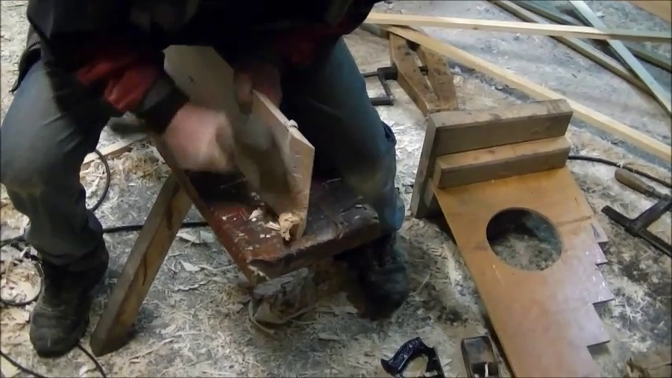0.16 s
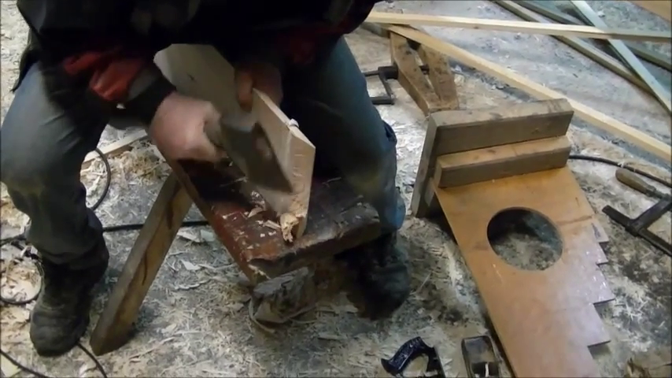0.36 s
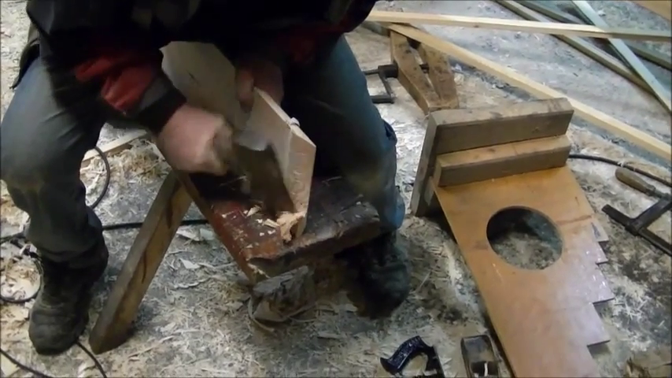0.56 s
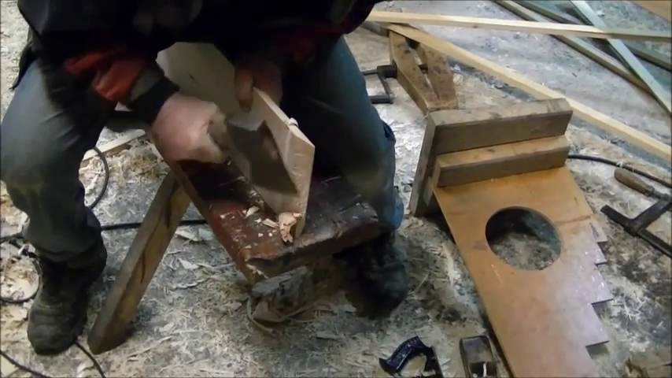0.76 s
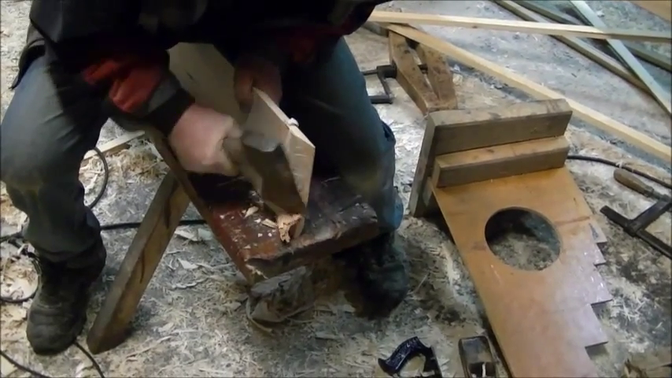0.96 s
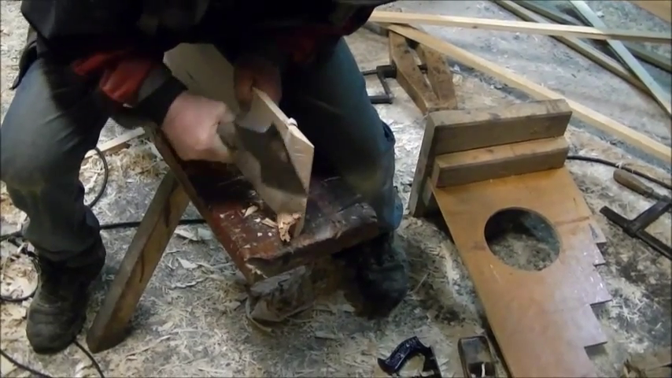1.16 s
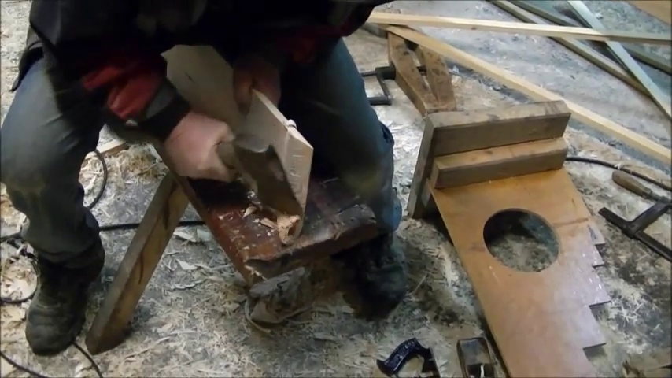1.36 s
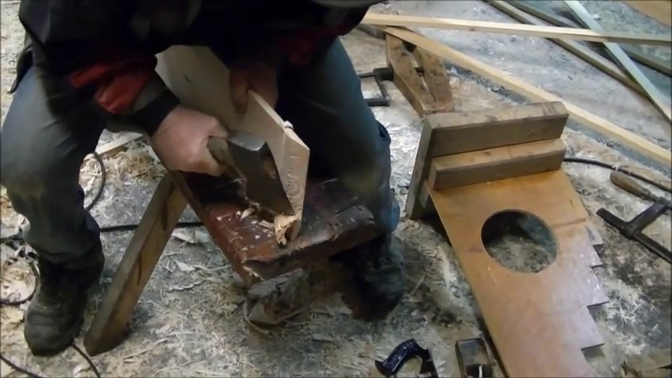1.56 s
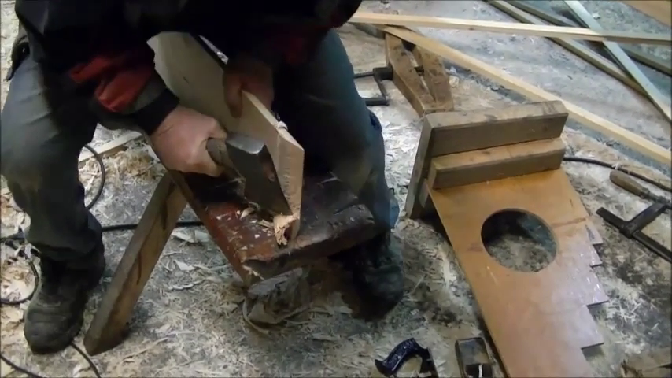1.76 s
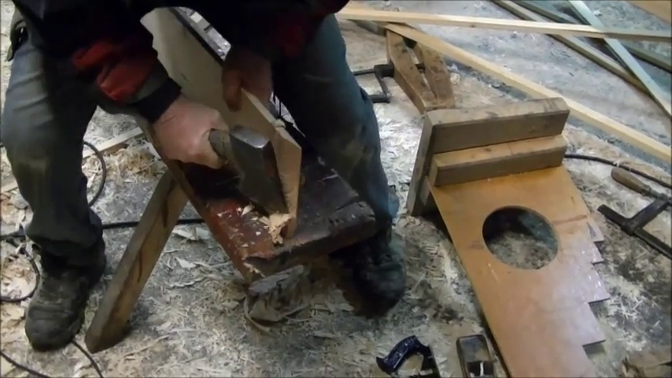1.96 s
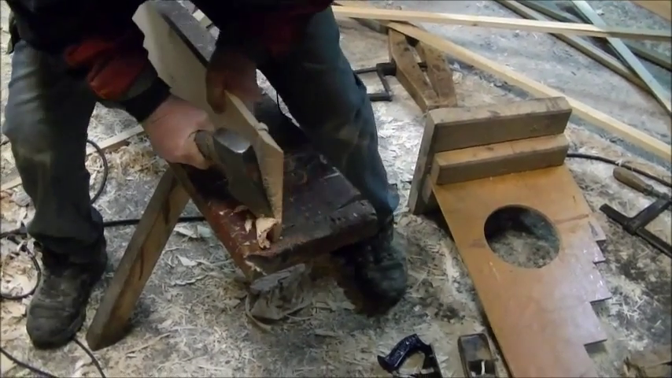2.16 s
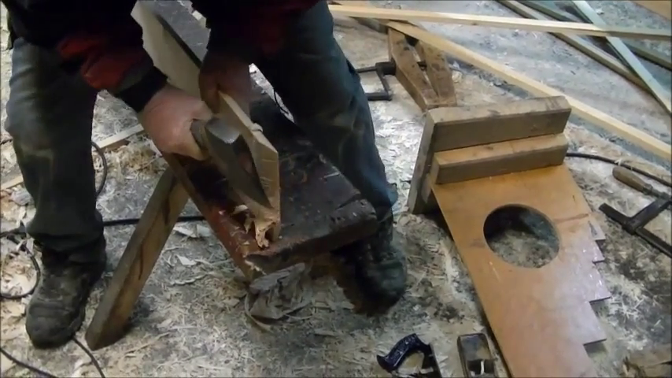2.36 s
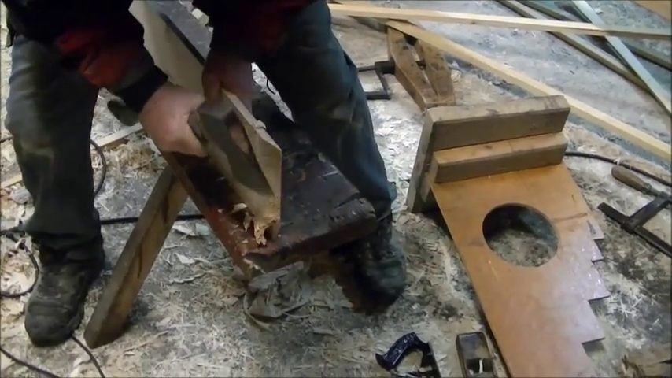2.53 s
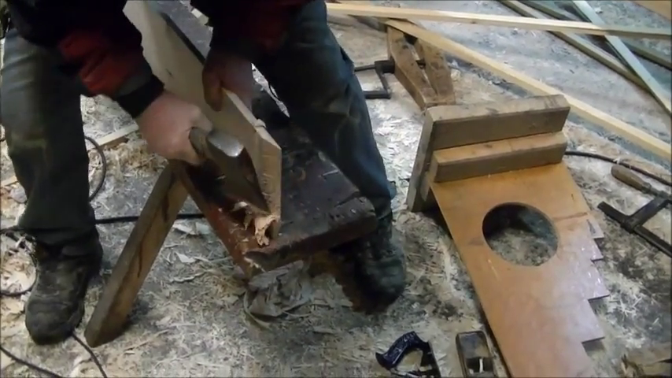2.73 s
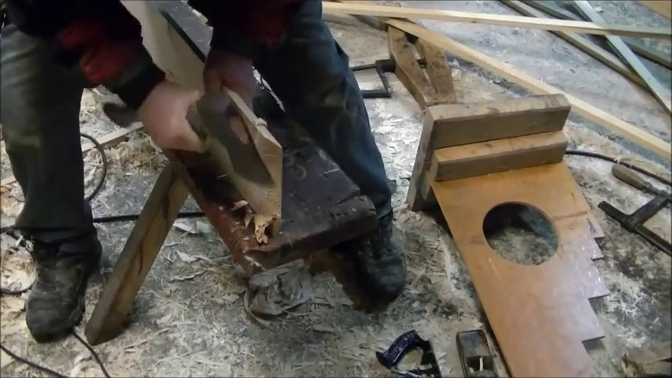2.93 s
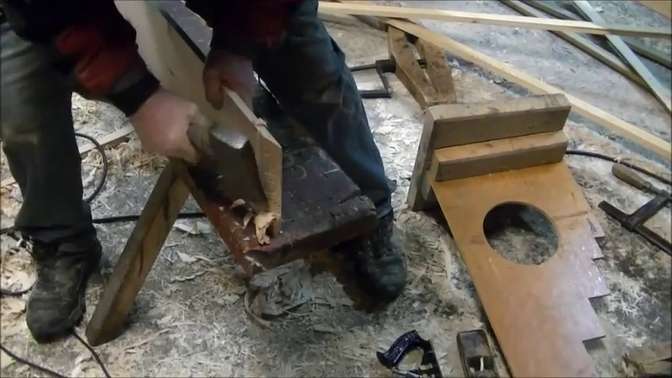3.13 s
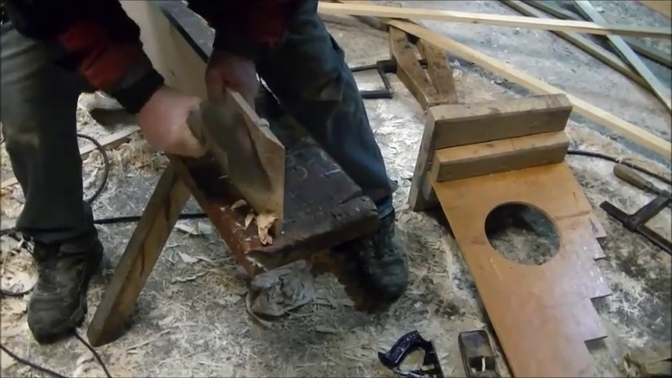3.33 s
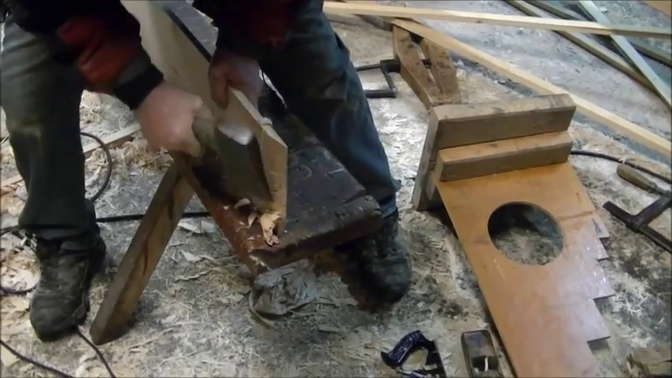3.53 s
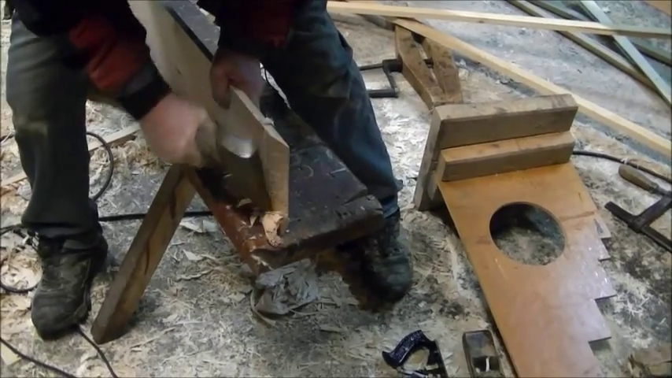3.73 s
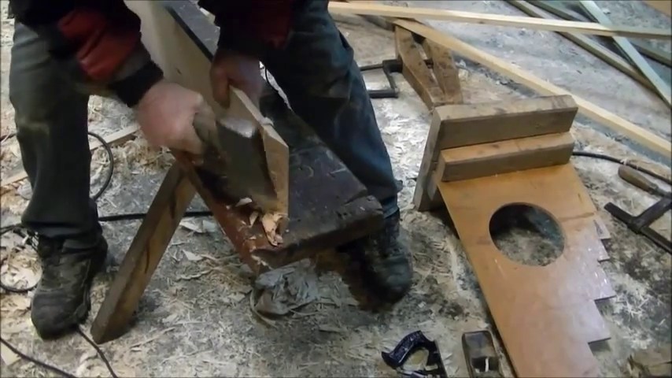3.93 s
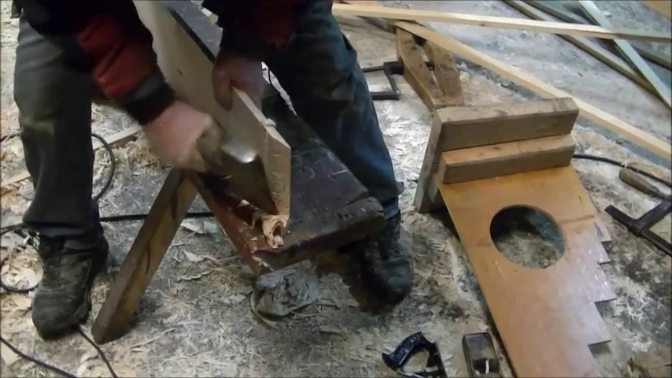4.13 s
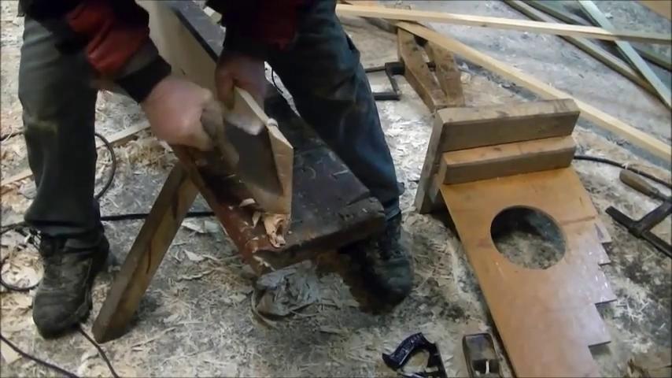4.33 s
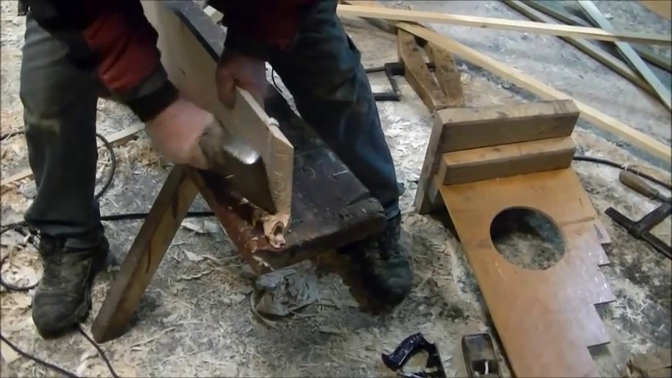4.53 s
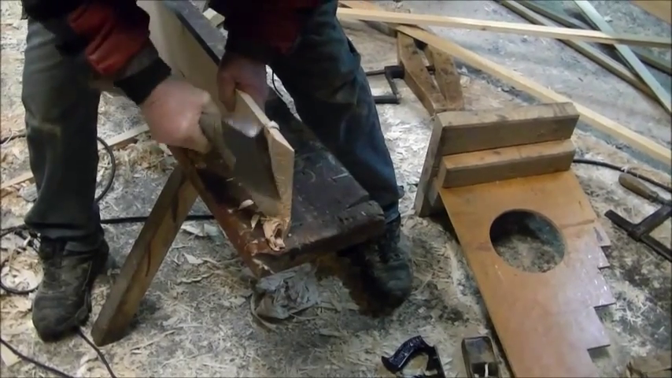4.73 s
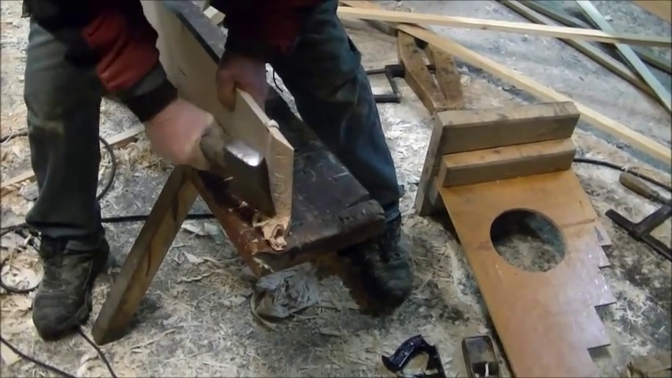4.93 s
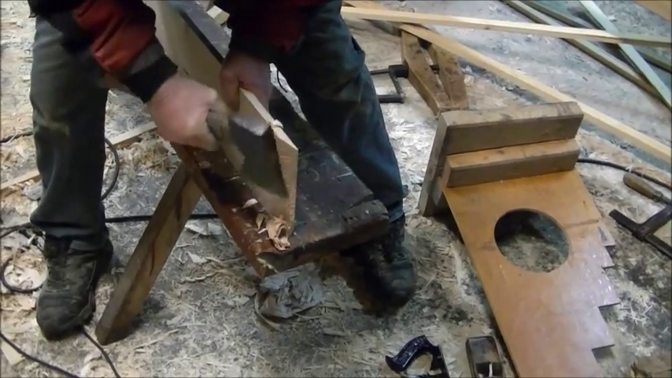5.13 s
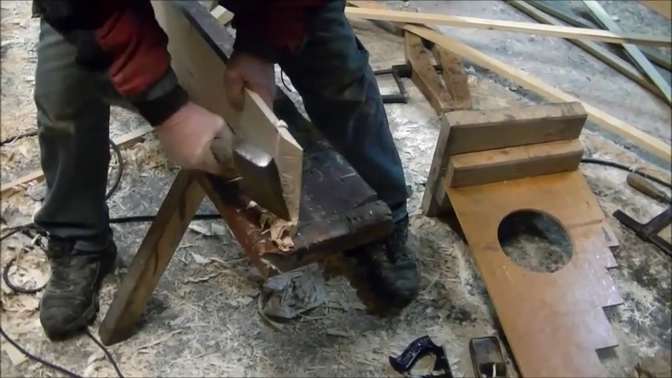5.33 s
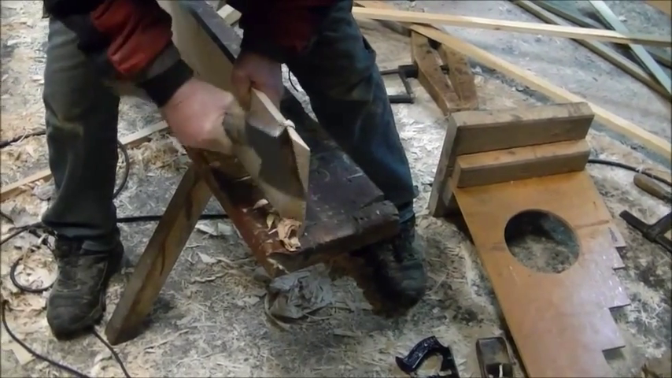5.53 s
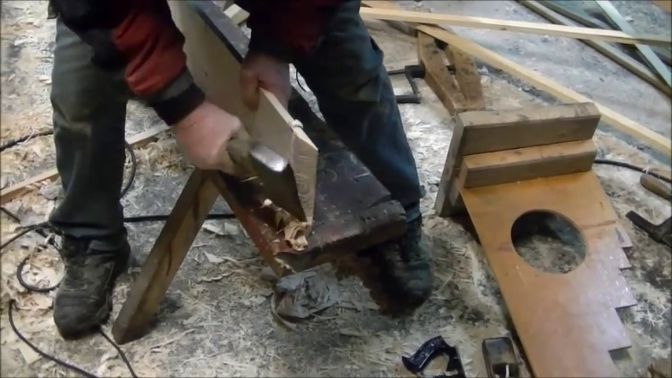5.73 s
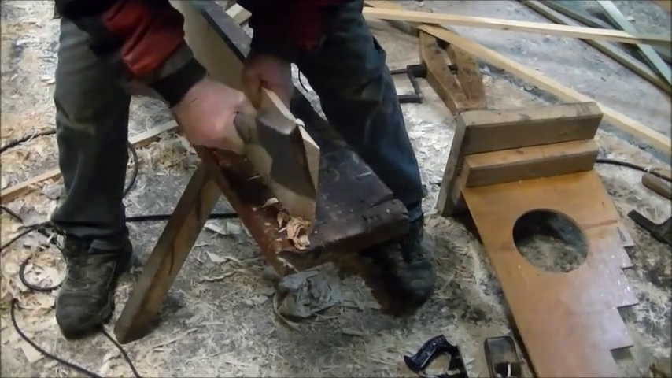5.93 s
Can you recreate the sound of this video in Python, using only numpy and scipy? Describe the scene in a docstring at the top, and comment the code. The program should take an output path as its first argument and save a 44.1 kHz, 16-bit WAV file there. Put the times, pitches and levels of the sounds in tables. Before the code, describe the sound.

Quick, sharp axe blows knock and crackle into wood in an echoing workshop, with one short break and small chips landing.

```python
"""Reverberant workshop: a hand axe hews the edge of a plank on a low wooden bench.
Each blow is a tick of the edge, a knock of plank and bench and a crackle of splitting fibres.
Chips land, a sleeve swishes, the plank bounces at times and is shifted in a short break.
A limiter ducks on the blows, so the room swells up behind them."""
import sys
import numpy as np
from scipy import signal
from scipy.fft import rfft, irfft, next_fast_len
from scipy.io import wavfile

SR = 44100
rng = np.random.default_rng(int(sys.argv[2]) if len(sys.argv) > 2 else 0)


def output_pcm(signal):
    """Save a mono or channel-first signal as 16-bit PCM at the path in sys.argv[1].

    Samples are clipped to [-1, 1] before scaling.
    """
    pcm = np.clip(np.atleast_2d(signal).T, -1, 1) * 32767
    wavfile.write(sys.argv[1], SR, np.round(pcm).astype(np.int16))


N = 268128
LEAD = SR // 4  # samples before t = 0: work already under way
TIME = np.arange(-LEAD, N) / SR

# axe blows: t/s, skid before bite/s, plank/dB, bench/dB, brightness/Hz, split/dB, split half-length/s
AXE_BLOWS = [ (-.16, 0.00093, -1.5, -5.5, 1950, -4, .002), (.2278, 0.00025, 11.5, -3, 2410, -9.5, 0.0038),
             (.6134, 0.00055, 13, -6, 2300, -10.5, .003), (1.02, 0.00005, 11, -11, 2860, -8, 0.0027),
             (1.405, 0.00039, 10, -3.5, 3630, -14, 0.0035), (2.6476, 0.00033, 8.5, -3, 2480, -9, 0.0032),
             (3.0389, 0.00073, 9.5, 1.5, 2550, -11.5, .0025), (3.4198, 0.0021, 1.5, -5, 2870, -3, 0.00061),
             (3.7845, 0.000043, 7.5, -5.5, 3560, -9.5, 0.0036),
             (4.1685, 0.001954, 9, -3, 3530, 0.5, 0.0013), (4.546, 0.0076, -0.5, -11.5, 2370, -20.5, .011),
             (4.9334, .0008, 4.5, -13.5, 3040, -12, .006),
             (5.3428, 0.0067, -2.5, -9.5, 2440, -16.5, 0.0082),
             (5.733, 0.0035, -12, -9.5, 2400, -13.5, 0.0026)]
# spectrum of snapping fibres: f/Hz, relative level/dB
FIBRE_SPECTRUM = [(300, -8), (1500, 5), (2500, 1), (4000, -5), (6200, -13), (8200, -2), (10500, -1),
                  (13000, -14), (16000, -18), (18000, -30)]


def from_db(db):
    """Decibels to gain."""
    return 10 ** (np.asarray(db) / 20)


def at_hz(points, hz):
    """Read a table on a log-frequency axis."""
    points_hz, values = np.transpose(points)
    return np.interp(np.log(np.maximum(hz, 1)), np.log(points_hz), values)


def colour(x, spectrum):
    """Filter by a spectrum; white input keeps its power."""
    size = next_fast_len(x.shape[-1])
    gain = from_db(at_hz(spectrum, np.fft.rfftfreq(size, 1 / SR)))
    gain /= np.sqrt(np.mean(gain ** 2))
    return irfft(rfft(x, size) * gain, size)[..., :x.shape[-1]]


def cut(x, hz, kind, order=2):
    """Causal Butterworth filter."""
    return signal.sosfilt(signal.butter(order, hz, kind, fs=SR, output="sos"), x + 1e-18)


def add(track, at_s, sound):
    """Mix a sound into a track."""
    start = max(LEAD + round(at_s * SR), 0)
    track[start:start + len(sound)] += sound[:len(track) - start]


def diffuse(count):
    """White stereo noise, alike in the bass, nearly unrelated in the treble."""
    # f/Hz, left-right correlation
    correlation = [(60, 0.29), (130, .91), (290, 0.78), (640, 0.66), (1400, 0.19), (3100, -0.23),
                   (6800, -0.32), (15000, -0.055)]
    size = next_fast_len(count)
    mid, side = rfft(rng.standard_normal((2, size)))
    alike = at_hz(correlation, np.fft.rfftfreq(size, 1 / SR))
    spectra = np.sqrt((1 + alike) / 2) * mid + np.sqrt((1 - alike) / 2) * side * [[1], [-1]]
    return irfft(spectra, size)[:, :count]


def crackle(count, uneven_db):
    """Dense snaps of uneven size; rms 1."""
    snaps = rng.standard_normal(count)
    snaps *= from_db(uneven_db * np.clip(rng.standard_normal(count), -2, 2))
    return snaps / np.std(snaps)


def strike(modes, scatter_db=1.0, detune=0.02):
    """Struck body: the contact point shifts each mode's level and pitch; neighbours swing oppositely."""
    hz, db, t60_s = np.transpose(modes)[:, :, None]
    t = np.arange(SR // 8) / SR
    strength, pitch = rng.standard_normal((2, len(modes), 1))
    envelopes = from_db(db + scatter_db * strength - 60 * t / t60_s)
    rings = envelopes * np.sin(2 * np.pi * hz * (1 + detune * pitch) * t)
    return rings[::2].sum(axis=0) - rings[1::2].sum(axis=0)


def wood_knocks(bounce_lowpass_hz=900, bounce_count=3, bounce_loss_db=9.5):
    """The edge bites, plank and bench ring; a softer bite is duller. The loose plank bounces at times."""
    # modes: f/Hz, level/dB, t60/s
    plank_modes = [(786, -15.5, 0.012), (1190, -0.5, 0.0042), (1398, 2.5, 0.0069), (1760, 1.5, 0.0052),
                   (2122, -1, 0.0048), (3184, -10, 0.0069), (3750, -10, 0.0035)]
    bench_modes = [(236.5, -1.5, 0.04), (307, -8.5, 0.095), (379.6, -8, 0.033), (463, -6.5, 0.03),
                   (555, -4.5, 0.013), (676.7, -18.5, 0.13), (732, -17.5, 0.065), (984, -14.5, 0.047)]
    # plank kicks against the bench: t/s, level/dB, bounce gap/s
    kicks = [(1.689, -24.5, 0.012), (2.031, -29.5, 0.039), (2.147, -33, .012), (3.0481, -5.5, 0.0071),
             (4.567, -4.5, .011), (4.962, -1.5, 0.0069), (5.751, -5, 0.031)]
    plank, bench = np.zeros((2, len(TIME)))
    for at_s, skid_s, plank_db, bench_db, bright_hz, *_ in AXE_BLOWS:
        ring = cut(strike(plank_modes), bright_hz, "low", order=3)
        add(plank, at_s + skid_s, from_db(plank_db) * ring)
        add(bench, at_s + skid_s, from_db(bench_db) * strike(bench_modes))
    for at_s, db, gap_s in kicks:
        for k in range(bounce_count):
            thump = cut(strike(bench_modes, scatter_db=2.0, detune=0.04), bounce_lowpass_hz, "low")
            add(bench, at_s + k * gap_s, from_db(db - k * bounce_loss_db) * thump)
    return cut(plank, 75, "high"), cut(bench, 153, "high")


def fibre_cracks(tick_decay_s=0.00085, ahead_db=-2.0, skid_loss_db=24, skid_scale_s=0.00053):
    """The edge ticks on entry, fibres tear as the shaving lifts. Returns the sound ahead and all round."""
    ahead, around = np.zeros((2, len(TIME)))
    t = np.arange(SR // 20) / SR
    for at_s, skid_s, _, _, bright_hz, split_db, half_length_s in AXE_BLOWS:
        tick_db = -skid_loss_db * (1 - np.exp(-skid_s / skid_scale_s))  # a square hit ticks loudest
        tick_db += 6 * np.log2(bright_hz / 2930)  # a duller blow ticks less, 6 dB/octave
        tick = from_db(tick_db) * np.exp(-t / tick_decay_s)
        split_peak_s = skid_s + 0.0012 + 0.43 * half_length_s
        split = from_db(split_db) * np.exp(-0.5 * ((t - split_peak_s) / half_length_s) ** 2)
        burst = (tick + split) * crackle(len(t), uneven_db=3.0)
        add(ahead, at_s, burst)
        # summed over all directions: same energy, flat spectrum
        flat_burst = irfft(np.exp(1j * np.angle(rfft(burst))))
        add(around, at_s, np.linalg.norm(burst) * flat_burst)
    return from_db(ahead_db) * colour(ahead, FIBRE_SPECTRUM), colour(around, FIBRE_SPECTRUM)


def chips(decay_s=0.0016, highpass_hz=5000, crumb_db=-51, flight_s=(0.12, 0.43)):
    """Larger chips, and one crumb thrown by each blow, land with a thin tick."""
    # larger chips landing: t/s, level/dB
    landings = [(.0773, -34), (1.616, -40), (1.6765, -38), (2.1247, -37), (2.16, -47), (2.258, -28.5),
                (3.3659, -43)]
    crumbs = [(at_s + rng.uniform(*flight_s), crumb_db) for at_s, *_ in AXE_BLOWS]
    ticks = np.zeros(len(TIME))
    t = np.arange(SR // 50) / SR
    for at_s, db in list(landings) + crumbs:
        tick = np.exp(-t / decay_s) * rng.standard_normal(len(t))
        add(ticks, min(at_s, TIME[-1]), from_db(db) * tick)
    return cut(colour(ticks, FIBRE_SPECTRUM), highpass_hz, "high")


def sleeve_swish(level_db=-56, swing_s=0.025):
    """A sleeve swishes on each downstroke, peaking just before the blow."""
    # cloth rubbing: f/Hz, relative level/dB
    spectrum = [(2000, -6), (6000, -31), (10000, -8), (12000, -15), (15000, -31)]
    swings = sum(np.exp(-0.5 * ((TIME - at_s) / swing_s + 1) ** 2) for at_s, *_ in AXE_BLOWS)
    return from_db(level_db) * swings * colour(rng.standard_normal(len(TIME)), spectrum)


def plank_scrape(rise_db_per_s=158, fall_db_per_s=227):
    """The plank scrapes as it is shoved to a new grip."""
    # shove peaks: t/s, level/dB
    shoves = [(2.035, -42.5), (2.145, -44.5), (2.324, -53.5)]
    # wood sliding: f/Hz, relative level/dB
    spectrum = [(80, -42), (250, -36), (500, -7), (1500, 8), (3000, -4), (6000, -16), (10000, -4.5),
                (15000, -19)]
    envelope = np.zeros(len(TIME))
    for at_s, db in shoves:
        below_peak_db = np.maximum(rise_db_per_s * (at_s - TIME), fall_db_per_s * (TIME - at_s))
        envelope += from_db(db - below_peak_db)
    return envelope * colour(crackle(len(TIME), uneven_db=15.0), spectrum)


def near_echoes(x, band_hz=(700, 2600)):
    """The plank's faces beam its midrange at near surfaces, which return it within milliseconds."""
    # reflections: delay/s, level/dB
    echoes = [(.0012, -28), (.0052, -30), (.0083, 5)]
    beam = cut(x, band_hz, "band", order=1)
    return sum(from_db(db) * np.interp(TIME - delay_s, TIME, beam) for delay_s, db in echoes)


def clutter(x, level_db=-2, span_s=0.0029, band_hz=(500, 4500)):
    """Floor, legs and lumber scatter a dense spray of early reflections."""
    t = np.arange(SR // 30) / SR
    spray = diffuse(len(t)) * t / span_s * np.exp(-2 * t / span_s)
    spray *= from_db(level_db) / np.linalg.norm(spray, axis=1, keepdims=True)
    midrange = cut(x, band_hz, "band", order=1)
    return signal.fftconvolve(midrange[None], spray, axes=1)[:, :len(x)]


def reverb(x, build_s=0.00077, mode_t60_s=0.78):
    """Diffuse reverberation, dying faster in the treble, plus a few standing waves."""
    # diffuse tail: f/Hz, level/dB
    tail_db = [(60, -10), (110, 3), (200, 3), (300, 7), (600, 14), (1400, 3), (3000, 1), (6000, -0.5),
               (10000, -14), (15000, -7)]
    # tail decay: f/Hz, t60/s
    tail_t60_s = [(100, 1), (300, 1), (1200, 1), (2500, 0.81), (5000, 0.62), (10000, 0.36), (15000, .35)]
    # standing waves: f/Hz, level/dB
    room_modes = [(172, 17.5), (251, 14), (921, 19), (981, 15), (1180, 17), (1303, 15.5), (1399, 14.5),
                  (1515, 13), (2097, 10.5)]
    t = np.arange(SR * 5 // 4) / SR
    hz = np.fft.rfftfreq(len(t), 1 / SR)
    spectra = rfft(diffuse(len(t))) * from_db(at_hz(tail_db, hz))
    edges_hz = np.geomspace(30, 18000, 25)
    response = np.zeros((2, len(t)))
    for low_hz, high_hz in zip(edges_hz, edges_hz[1:]):
        decay_per_s = np.log(1000) / at_hz(tail_t60_s, np.sqrt(low_hz * high_hz))
        band = irfft(spectra * ((hz >= low_hz) & (hz < high_hz)), len(t))
        response += np.sqrt(2 * decay_per_s / SR) * band * np.exp(-decay_per_s * t)
    decay_per_s = np.log(1000) / mode_t60_s
    mode_envelope = 2 * decay_per_s / SR * np.exp(-decay_per_s * t)
    for mode_hz, db in room_modes:
        response += from_db(db) * mode_envelope * np.sin(2 * np.pi * (mode_hz * t + rng.random()))
    response *= 1 - np.exp(-t / build_s)
    return signal.fftconvolve(x[None], response, axes=1)[:, :len(x)]


def room_tone(level_db=-56):
    """Faint, steady, diffuse noise."""
    # background: f/Hz, relative level/dB
    spectrum = [(30, -4), (100, -6.5), (170, -14), (400, -21), (1200, -11.5), (3000, -10), (6000, -17.5),
                (10500, -18.5), (15000, -30)]
    return from_db(level_db) * colour(diffuse(len(TIME)), spectrum)


def pan_left(x, left_db, right_lag_s):
    """Left channel louder, right channel later."""
    delayed = np.interp(TIME - right_lag_s, TIME, x)
    return np.array([from_db(left_db / 2) * x, from_db(-left_db / 2) * delayed])


def scene(floor_boost_db=4):
    """Work slightly left of centre in a quiet, live room; the floor reinforces the bench's thump."""
    plank, bench = wood_knocks()
    crack_ahead, crack_around = fibre_cracks()
    small_sounds = chips() + sleeve_swish() + plank_scrape()
    body = plank + near_echoes(plank) + from_db(floor_boost_db) * bench
    direct = pan_left(body, left_db=1.8, right_lag_s=70e-6)
    direct += pan_left(crack_ahead + small_sounds, left_db=1.4, right_lag_s=4e-6)
    radiated = plank + bench + crack_around
    room = clutter(radiated) + reverb(radiated + small_sounds) + room_tone()
    return (direct + room)[:, LEAD:]


def limiter(x, ceiling_db=1.0, release_db_per_s=105, attack_s=0.0001, lookahead_s=0.00056):
    """Gain drops at once on a peak and climbs back at a steady rate."""
    t = np.arange(N) / SR
    peak_db = 20 * np.log10(np.abs(x).max(axis=0) + 1e-9)
    over_db = np.maximum(peak_db - ceiling_db, 0)
    held_db = np.maximum.accumulate(over_db + release_db_per_s * t) - release_db_per_s * t
    pole = np.exp(-1 / (attack_s * SR))
    duck_db = signal.lfilter([1 - pole], [1, -pole], held_db)
    return x * from_db(-np.interp(t + lookahead_s, t, duck_db))


def record(dry, highpass_hz=67, lowpass_hz=15800):
    """Bass roll-off, limiter, soft clip, steep top cut."""
    limited = limiter(cut(dry, highpass_hz, "high", order=1))
    rounded = limited / (1 + limited ** 6) ** (1 / 6)
    return signal.sosfilt(signal.ellip(10, 0.1, 90, lowpass_hz, fs=SR, output="sos"), rounded)


dry = scene()
out = record(dry)
output_pcm(out)
```